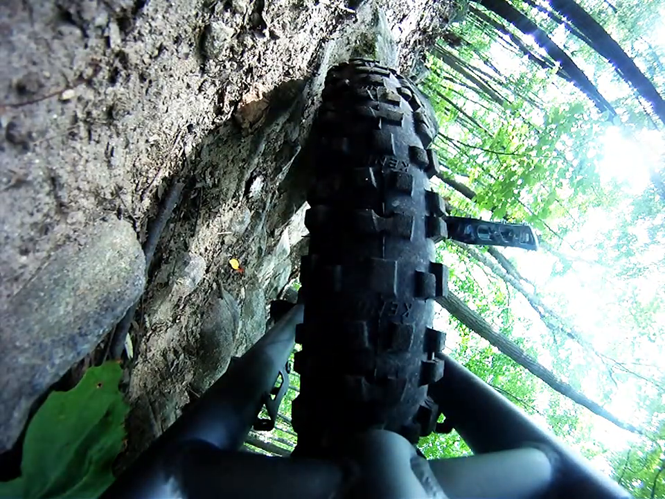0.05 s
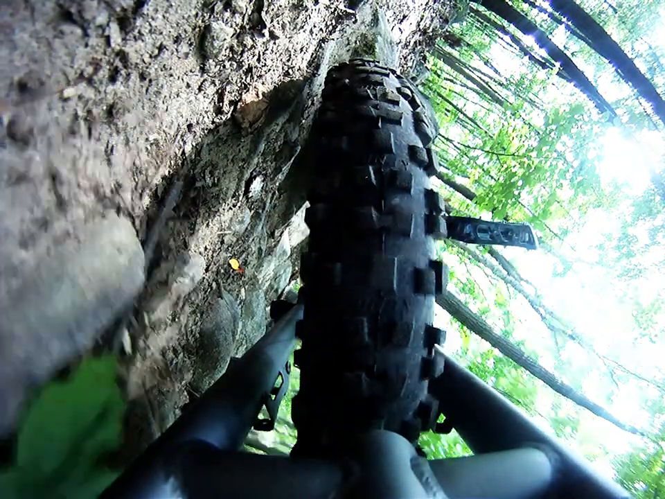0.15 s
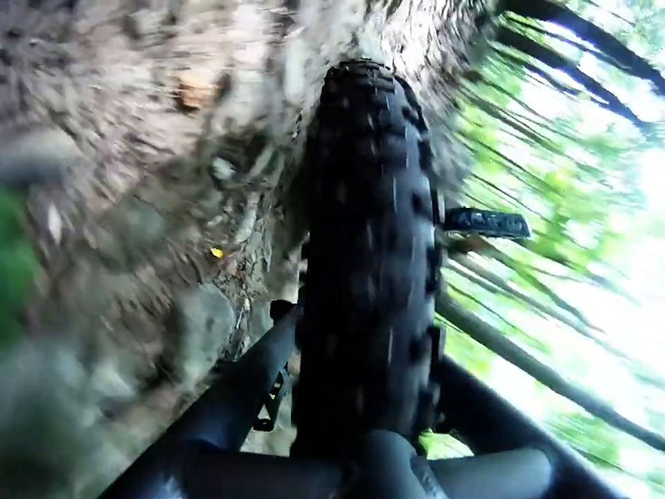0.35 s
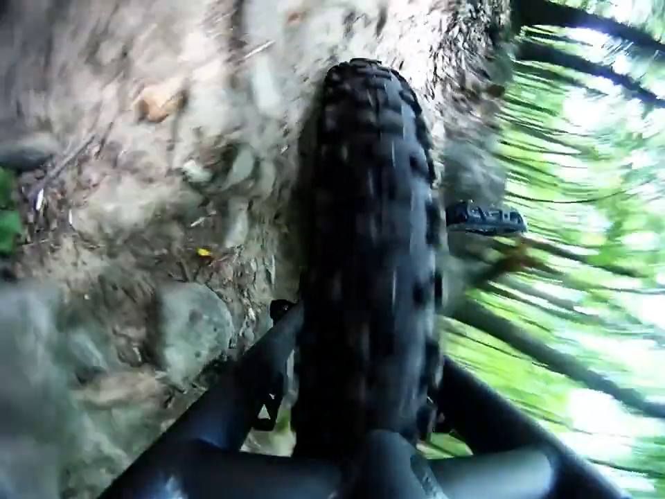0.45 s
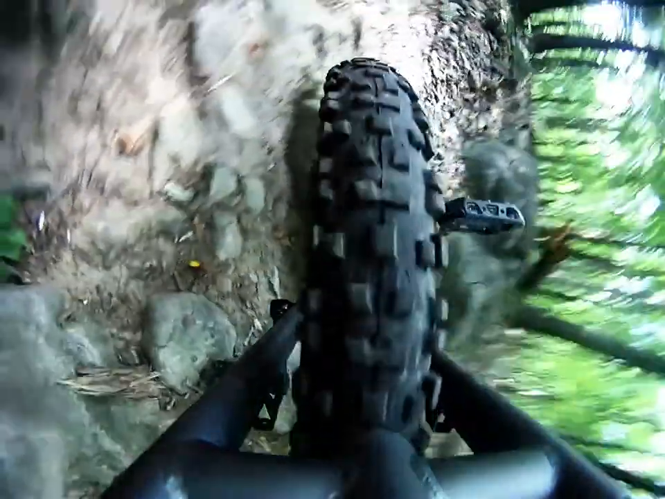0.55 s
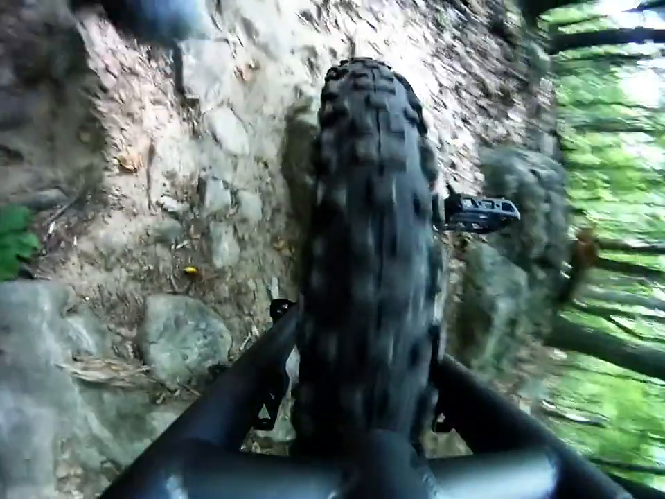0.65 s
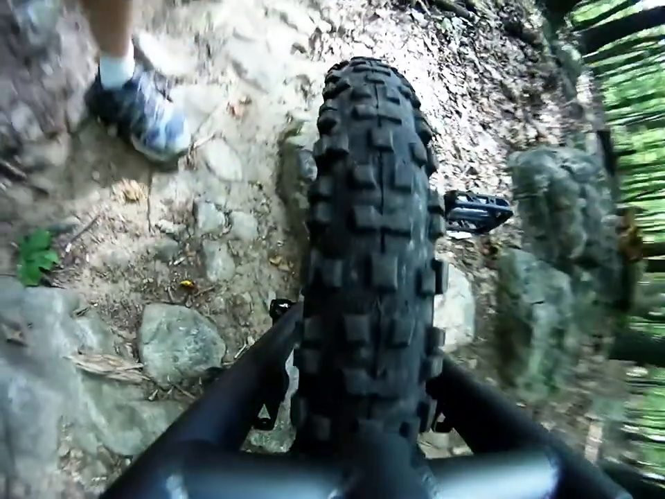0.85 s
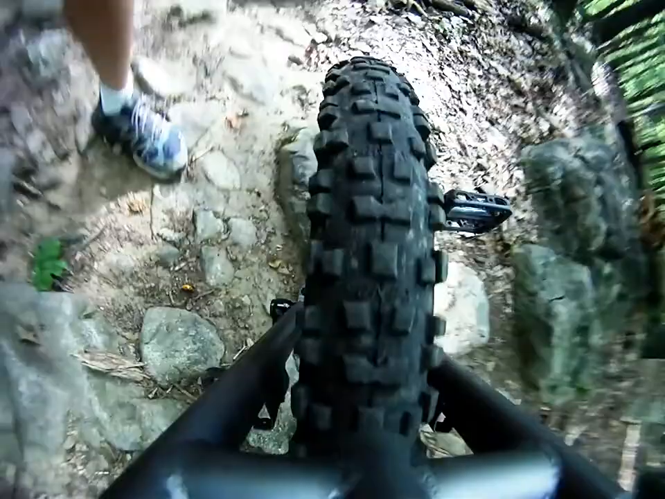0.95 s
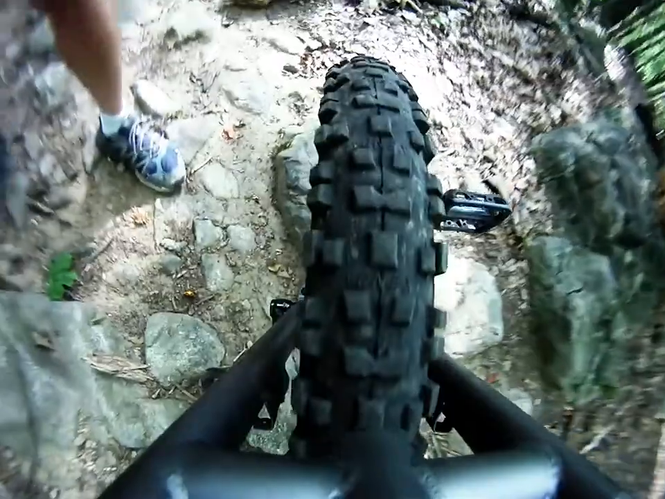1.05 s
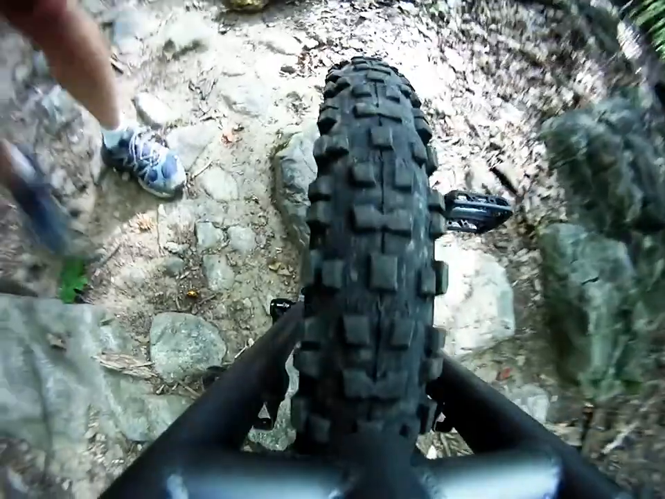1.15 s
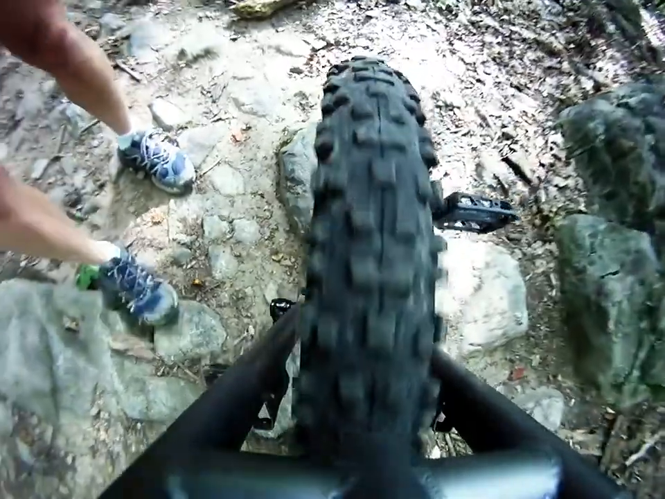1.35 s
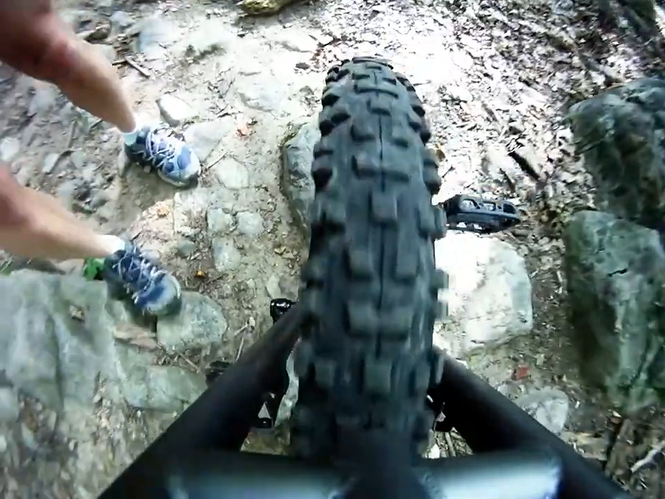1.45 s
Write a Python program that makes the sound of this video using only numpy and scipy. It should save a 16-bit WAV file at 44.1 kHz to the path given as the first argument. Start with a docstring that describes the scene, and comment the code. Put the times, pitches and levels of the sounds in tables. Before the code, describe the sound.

A unicycle rattles, knocks and creaks close up, then scrapes lightly on stony ground.

```python
"""A camera mount knocks, chatters and creaks as a unicycle is swung upright on a stony forest trail.
The microphone is right on it, in a camera case fixed to the frame. Knocks ring the mount, friction
rings the frame, and jolts set it wobbling on the soft tyre. Gritty scrapes, ticks and a few soft
footfalls follow over quiet outdoor air. The camera's slow sampling adds a tinny sheen."""
import sys
import numpy as np
from scipy import signal
from scipy.fft import rfft, irfft
from scipy.io import wavfile
from scipy.ndimage import uniform_filter1d

SR = 44100
rng = np.random.default_rng(int(sys.argv[2]) if len(sys.argv) > 2 else 0)


def inscribe(sig):
    """Save sig as 16-bit PCM at rate SR to the path in sys.argv[1].

    A 1-D sig is mono; a 2-D sig holds one channel per row.
    Samples are clipped to [-1, 1] before scaling.
    """
    pcm = np.round(np.clip(np.atleast_2d(sig).T, -1, 1) * 32767)
    wavfile.write(sys.argv[1], SR, pcm.astype(np.int16))


N = 66150


def undb(db):
    return 10 ** (np.asarray(db) / 20)

def unit(x):
    """Scale to rms 1."""
    return x / np.sqrt(np.mean(x ** 2) + 1e-18)

def clock():
    return np.arange(N) / SR

def curve(points):
    """Gain from (s, dB) points, silent outside them."""
    s, db = np.array(points).T
    return undb(np.interp(clock(), s, db, left=-120, right=-120))

def strike(start, rise, t60):
    """Envelope: a short rise, then an exponential fall."""
    age = clock() - start
    return np.clip(age / rise, 0, 1) * np.exp(-np.log(1000) * np.maximum(age - rise, 0) / t60)

def swell(peak, half):
    """Bell-shaped envelope."""
    return np.exp(-((clock() - peak) / half) ** 2 / 2)

def colour(x, points):
    """Filter by (Hz, dB) points with a steep bass roll-off; rms 1."""
    hz, db = np.array(points).T
    f = np.maximum(np.fft.rfftfreq(N, 1 / SR), 1)
    gain = undb(np.interp(np.log(f), np.log(hz), db)) / np.hypot(1, (hz[0] / f) ** 4)
    return unit(irfft(rfft(x) * gain, N))

def band(x, hz, width):
    """A resonance with steep skirts; width in Hz."""
    f = np.fft.rfftfreq(N, 1 / SR)
    detuning = (f * f - hz * hz) / (np.maximum(f, 1) * width * np.sqrt(2))
    return irfft(rfft(x) / (1 + 1j * detuning) ** 2, N)

def grains(rate, spread_db):
    """Random tiny contacts of uneven size, about `rate` a second."""
    contacts = (rng.random(N) < rate / SR) * rng.choice([-1, 1], N)
    return unit(contacts * undb(spread_db * np.clip(rng.standard_normal(N), -2, 2)))

def waver(rate):
    """Random drift through `rate` values a second, spread near 1."""
    return np.interp(clock() * rate, np.arange(N), rng.standard_normal(N))

def tone(hz):
    """A sine on a steady or moving pitch, at a random phase."""
    return np.sin(2 * np.pi * (np.cumsum(hz * np.ones(N)) / SR + rng.random()))


# The forest air around the microphone. Each row: frequency in Hz, gain in dB.
AIR_SPECTRUM = [(21, -37), (36, -1), (81, 2.5), (176, -6.5), (306, -11.5), (412, -9), (578, -4),
                (616, -16.5), (730, -21.5), (961, -25.5), (1190, -16), (1320, -27.5), (1600, -18),
                (1930, -22.5), (2110, -20.5), (2390, -23), (2550, -26), (2830, -26), (3810, -24.5),
                (4240, -34.5), (5700, -39), (7410, -74), (12500, -120)]

def air():
    """Low outdoor rumble and a faint hiss, wavering slightly in level."""
    return undb(-47 + waver(rate=11.14)) * colour(rng.standard_normal(N), AIR_SPECTRUM)


# The frame's resonances. Each row: frequency in Hz, width in Hz, gain in dB.
FRAME_MODES = [(238, 75, -4.5), (495, 79, 2.5), (880, 170, -9), (1335, 136, -1.5), (2690, 246, -0.5),
               (3760, 125, -3.5), (4740, 300, -14)]
# The opening rub along the frame. Each row: time in seconds, level in dB.
RUB_LEVELS = [(0, -32.5), (.05, -34.5), (.085, -39), (.11, -45.5), (.15, -52), (.19, -46.5), (.22, -91)]

def frame_rub(gain):
    """Fine friction rings the frame that carries the microphone."""
    friction = grains(rate=7600, spread_db=1)
    return gain * unit(sum(undb(db) * band(friction, hz, width) for hz, width, db in FRAME_MODES))


# The mount's modes, rung by chatter and knocks. Each row: frequency in Hz, gain in dB, t60 in seconds.
MOUNT_RESONANCES = [(229, -16, 0.065), (352, 0, 0.043), (406, -11, 0.046), (461.5, -2.5, 0.074),
                    (492.5, -4.5, 0.065), (561.6, -10.5, 0.062), (966, -4, 0.029), (1060, -1.5, 0.063),
                    (1139, -2.5, 0.11), (1435, -4, 0.026), (1902, -12, 0.053), (2528, -8, 0.086),
                    (3106, -4.5, 0.03), (3525, -14.5, 0.044), (3924, -13, 0.033)]
# Chatter close to the microphone. Each row: time in seconds, relative level in dB.
CHATTER_LEVELS = [(.185, -48), (.2, -35.5), (.225, -37.5), (.257, -35), (.275, -37.5), (.33, -28.5),
                  (.39, -36), (.414, -30.5), (.43, -29.5), (.46, -37), (.48, -26.5), (.515, -30.5),
                  (.54, -48), (.62, -48.5)]
# The loose parts' own sound. Each row: frequency in Hz, gain in dB.
CHATTER_SPECTRUM = [(47, -25), (80, -1), (142, -40), (185, -3), (365, -10), (512, 1), (570, -14),
                    (669, -2.5), (814, -21.5), (923, -4.5), (1100, -8.5), (2060, -26.5), (2510, -19.5),
                    (3460, -29), (3850, -14), (4280, -35), (5700, -41), (7410, -70), (12500, -120)]

def chatter():
    """Loose parts jitter between the knocks and keep the mount ringing."""
    contacts = grains(rate=1200, spread_db=6)
    ring = 0
    for hz, db, t60 in MOUNT_RESONANCES:
        tilt_db = -2 * np.log2(hz / 1000)
        ring += undb(db + tilt_db) * band(contacts, hz, width=2 * np.log(1000) / (np.pi * t60))
    jitter = colour(grains(rate=3000, spread_db=1), CHATTER_SPECTRUM)
    return curve(CHATTER_LEVELS) * (undb(-5.5) * unit(ring) + undb(1.5) * jitter)


# Creaks at the camera's clamp.
# Each row: peak time in seconds, level in dB, half length in seconds, pitch in Hz.
CLAMP_SLIPS = [(.194, -32.5, 0.001, 4000), (0.219, -23.5, 0.0027, 4005), (0.267, -30.5, 0.0057, 4000),
               (0.275, -24.5, 0.0024, 3970), (0.311, -21.5, 0.0015, 3960), (0.324, -14, 0.0018, 3980),
               (0.337, -43, .0025, 3900), (0.3806, -18, 0.0013, 3900), (0.3849, -10, .0017, 3900),
               (0.395, -30.5, 0.0026, 3880), (0.404, -31, 0.0011, 3880), (.439, -30.5, 0.0022, 3850),
               (0.478, -33.5, 0.0023, 3800), (.585, -30.5, 0.0016, 3850)]

def clamp_creaks():
    """The clamp slips in rough, shrill chirps of a few milliseconds."""
    chirps = sum(undb(db) * swell(s, half) * tone(hz * (1 + .013 * waver(rate=1000)))
                 for s, db, half, hz in CLAMP_SLIPS)
    roughness_db = 1.2 * np.clip(waver(rate=1000), -1, 1)
    return np.sqrt(2) * chirps * undb(roughness_db)


# Knocks right at the microphone.
# Each row: start in seconds, relative level in dB, extra dB for low modes, extra dB for high modes.
MOUNT_KNOCKS = [(0.196, -27.5, -17, -10), (.203, -27.5, -6.5, 12.5), (0.2167, -16.5, 0, -20),
                (0.227, -30, 13, -11), (.266, -29, -19, 14.5), (.274, -18.5, -3, 4.5),
                (0.29, -27.5, 4.5, 8.5), (0.311, -17, -1, 6.5), (.321, -17, -2.5, 6), (0.329, -25, 3, -10),
                (0.341, -28.5, 6.5, 6.5), (0.348, -43.5, 21, 23.5), (0.356, -22.5, 9, -9),
                (.371, -26.5, 4, -0.5), (.382, -16.5, -4.5, -1), (0.396, -36, 15, -23),
                (0.426, -34.5, -7, 6.5), (.433, -37, 12, 8.5), (.473, -31, 3.5, -22),
                (0.488, -47, -10, -15), (.507, -28.5, 2, 0)]
# The case around the microphone. Each row: frequency in Hz, gain in dB.
CASE_SPECTRUM = [(71, -59), (120, -27), (155, -14), (215, -5), (256, -32), (343, -8), (489, -25.5),
                 (782, -37), (1100, 4), (1290, -28), (1420, -14), (1590, -9.5), (1870, -22), (2090, -12.5),
                 (2500, -4), (2760, -23), (3140, -5), (3570, -18.5), (3930, -10.5), (4330, -38),
                 (5700, -29), (7410, -73), (12500, -120)]

def mount_knocks(contact_s=.0032, low_hz=750, high_hz=1900):
    """Each knock rings the mount's modes, slightly detuned, and cracks through the case."""
    rings = np.zeros(N)
    age = clock()[:SR // 5]
    for start, db, low_db, high_db in MOUNT_KNOCKS:
        ring = 0
        for hz, mode_db, t60 in MOUNT_RESONANCES:
            extra_db = low_db if hz < low_hz else high_db if hz > high_hz else 0
            pitch = hz * (1 + .015 * np.sqrt(low_hz / hz) * rng.standard_normal())
            decay = undb(mode_db + extra_db) * np.exp(-np.log(1000) * age / t60)
            ring += decay * np.sin(2 * np.pi * (pitch * age + rng.random()))
        i = int(start * SR)
        rings[i:i + len(age)] += undb(db + 2.5) * ring * np.minimum(age / contact_s, 1)
    cracks = sum(undb(db - 3) * strike(s, contact_s, t60=.03) for s, db, _, _ in MOUNT_KNOCKS)
    return rings + cracks * colour(grains(rate=5000, spread_db=4), CASE_SPECTRUM)


# Jolts reaching the microphone through the frame. Each row: start in seconds, level in dB.
FRAME_JOLTS = [(0.199, -27), (.295, -32.5), (.365, -26), (.427, -31), (0.533, -32), (0.647, -36),
               (0.82, -32)]

def wobble(sway_hz=43.65, tyre_hz=75.97):
    """The frame sways on the soft tyre; each jolt feeds the sway and rings the tyre."""
    envelope = sum(undb(db) * strike(s, rise=.013, t60=.38) for s, db in FRAME_JOLTS)
    sway = tone(sway_hz * (1 + .036 * waver(rate=16.7)))
    tyre = tone(tyre_hz * (1 + .083 * waver(rate=31.7)))
    return envelope * (sway + undb(-9) * tyre)


# Soft bumps and footfalls nearby. Each row: start in seconds, level in dB, centre in Hz.
SOFT_BUMPS = [(0.451, -22.5, 100), (0.64, -31.5, 270), (0.699, -27.5, 250), (.703, -33, 557),
              (1.207, -33, 350), (1.227, -35.5, 307), (1.259, -33.5, 282), (1.272, -36.5, 150)]

def bumps():
    """Each soft impact is a dull thud: a brief tone with a band of noise around it."""
    thuds = np.zeros(N)
    for start, db, hz in SOFT_BUMPS:
        thud = tone(hz) + undb(-3) * unit(band(rng.standard_normal(N), hz, width=.9 * hz))
        thuds += undb(db) * strike(start, rise=.0018, t60=.026) * thud
    return thuds


# Single bits of grit on the trail. Each row: start in seconds, level in dB.
GRIT_TICKS = [(.4645, -35), (0.5079, -24), (0.513, -35), (0.527, -36), (0.531, -40.5), (0.555, -39),
              (.577, -36), (0.593, -36), (0.649, -33.5), (0.85, -37), (0.857, -36), (0.875, -49),
              (0.893, -34.5), (0.962, -42), (.982, -42.5)]
# Their bright sound. Each row: frequency in Hz, gain in dB.
TICK_SPECTRUM = [(600, -26), (1500, -13), (2300, -4), (3000, 1.5), (3900, 2.5), (4800, -6.5), (5700, -12.5)]

def grit_ticks():
    """Grit ticks in short, sharp bursts of noise."""
    envelope = sum(undb(db) * strike(s, rise=.0011, t60=.014) for s, db in GRIT_TICKS)
    return envelope * colour(rng.standard_normal(N), TICK_SPECTRUM)


# Scraping close by. Each row: time in seconds, level in dB.
SCRAPE_LEVELS = [(.5, -80), (.528, -40), (.545, -70), (.568, -55.5), (.585, -35), (.605, -56),
                 (.647, -57.5), (.657, -32.5), (.675, -38.5), (.71, -37), (.74, -48), (.775, -41),
                 (.815, -31), (.83, -51), (.86, -49), (.92, -52.5), (.975, -47.5), (1.005, -52.5),
                 (1.055, -45), (1.1, -59), (1.2, -63)]
# Its rasp at the microphone. Each row: frequency in Hz, gain in dB.
SCRAPE_SPECTRUM = [(290, -62), (500, -4.5), (565, -19), (686, -4.5), (791, -16), (1150, -8), (1290, -7.5),
                   (1580, -6), (1820, -16.5), (2170, -8), (2710, -11.5), (3000, -6.5), (3390, -9.5),
                   (3910, -3), (5700, -27), (7410, -34), (12500, -120)]

def scrape():
    """Dense tiny contacts run together into a gritty scrape."""
    return curve(SCRAPE_LEVELS) * colour(grains(rate=2600, spread_db=3), SCRAPE_SPECTRUM)


def slide(start=.745, end=.823, from_hz=680, to_hz=1640, width_hz=300):
    """A slide rings the frame; its resonance rises and swells as it quickens, then it stops short."""
    t = clock()
    progress = np.clip((t - start) / (end - start), 0, 1)
    gate = uniform_filter1d(1. * ((t > start) & (t < end)), size=200)
    hz = from_hz * (to_hz / from_hz) ** progress
    resonance = unit(sum(waver(rate=2 * width_hz) * tone(hz) for _ in range(2)))
    return gate * undb(8 * progress - 12) * (undb(-34.5) * resonance + frame_rub(undb(-40)))


# Shoes beside the unicycle. Each row: peak time in seconds, level in dB, half length in seconds.
SHOE_SHUFFLES = [(1.218, -51.5, 0.01), (1.24, -46.5, 0.0072), (1.28, -53, 0.015), (1.41, -54, 0.024),
                 (1.472, -59.5, 0.05)]
# A sole on the trail's dirt. Each row: frequency in Hz, gain in dB.
SHOE_SPECTRUM = [(410, -39), (700, 4.5), (764, -23.5), (857, -4), (1230, -26), (1490, 1.5), (1840, -3.5),
                 (2130, -3.5), (2570, -8.5), (3170, -7), (4010, -25), (4740, -8.5), (5700, -58),
                 (7410, -67), (12500, -120)]

def shuffles():
    """Dirt crunches as the soles press on it."""
    pressure = sum(undb(db) * swell(s, half) for s, db, half in SHOE_SHUFFLES)
    return pressure * colour(grains(rate=3000, spread_db=3), SHOE_SPECTRUM)


def pebble():
    """One pebble clacks underfoot."""
    clack = unit(band(rng.standard_normal(N), hz=1300, width=750))
    return undb(-36) * strike(start=1.4705, rise=.0006, t60=.028) * clack


def scene():
    """The unicycle and the trail, in mono at the camera case."""
    unicycle = mount_knocks() + chatter() + clamp_creaks() + frame_rub(curve(RUB_LEVELS)) + wobble()
    trail = bumps() + grit_ticks() + scrape() + slide() + shuffles() + pebble()
    return (unicycle + trail + air())[None]


def record(dry):
    """The camera samples slowly and holds each value, mirroring every resonance into the treble."""
    hold_hz, input_edge_hz, top_hz, ceiling = 12000, 5820, 15300, .88
    f = np.fft.rfftfreq(N, 1 / SR)
    hold_droop = np.sinc(f / hold_hz)
    input_lowpass = (f < hold_hz / 2) / np.hypot(1, (f / input_edge_hz) ** 20)
    narrowed = irfft(rfft(dry) * input_lowpass / np.maximum(hold_droop, .5), N)
    mirrored = narrowed * (1 + 2 * np.cos(2 * np.pi * hold_hz * clock()))
    held = irfft(rfft(mirrored) * hold_droop, N)
    rounded = held / (1 + (held / ceiling) ** 6) ** (1 / 6)  # soft-clips the peaks
    top_cut = signal.ellip(10, .2, 80, top_hz, fs=SR, output="sos")
    return signal.sosfilt(top_cut, rounded)


dry = scene()
out = record(dry)
inscribe(out)
```